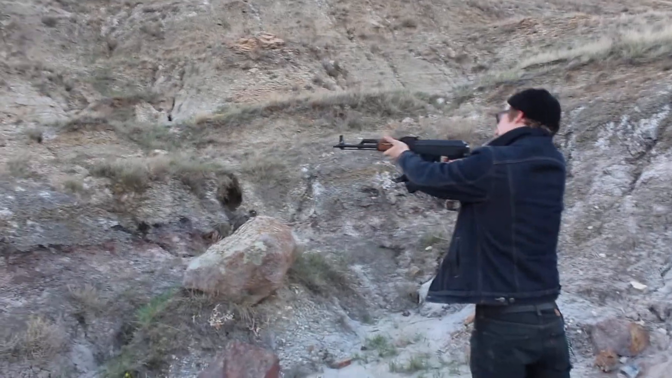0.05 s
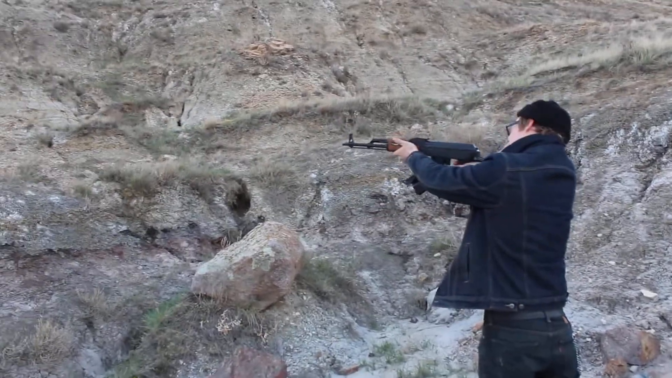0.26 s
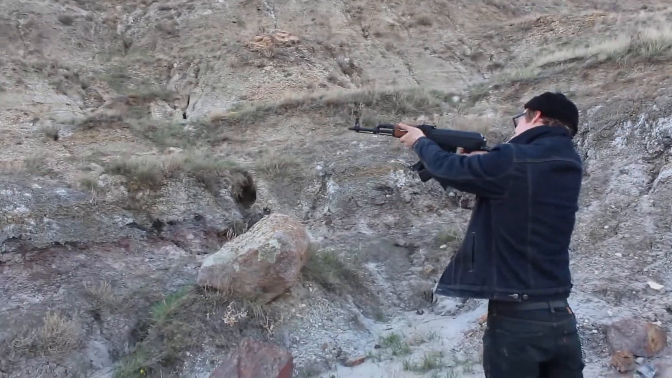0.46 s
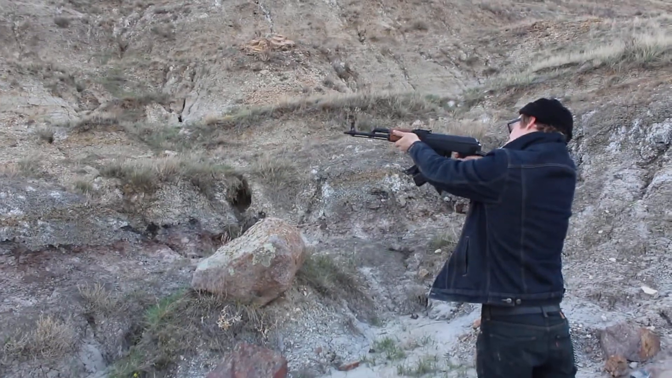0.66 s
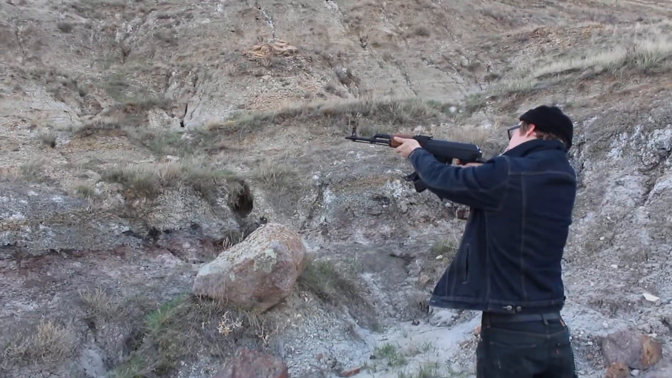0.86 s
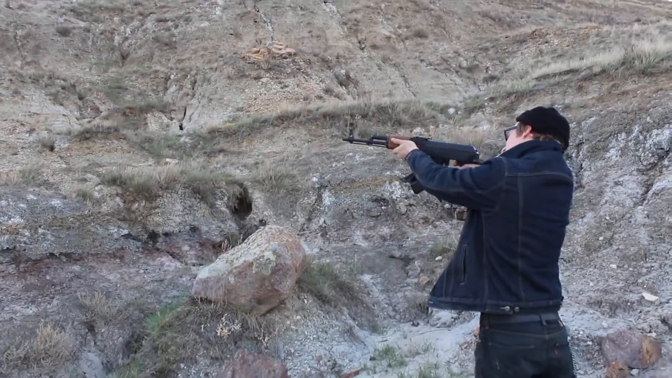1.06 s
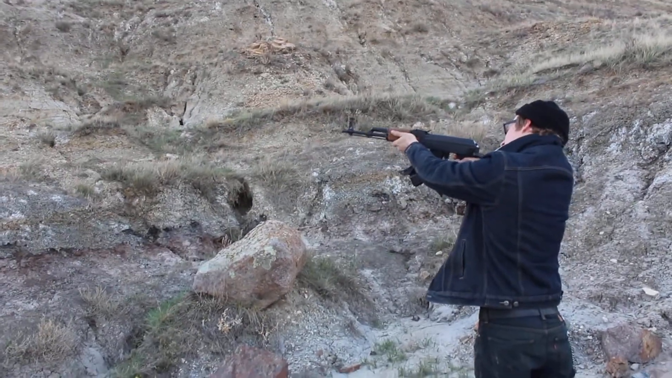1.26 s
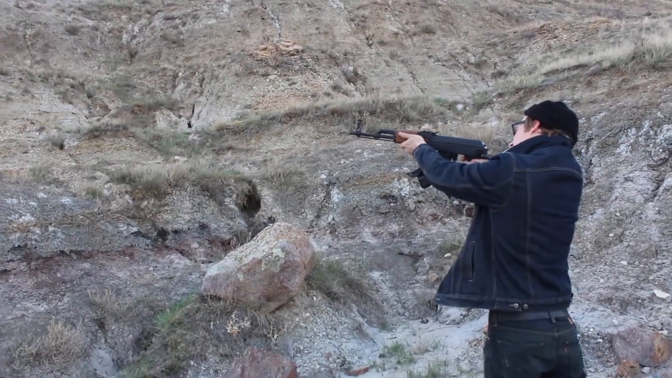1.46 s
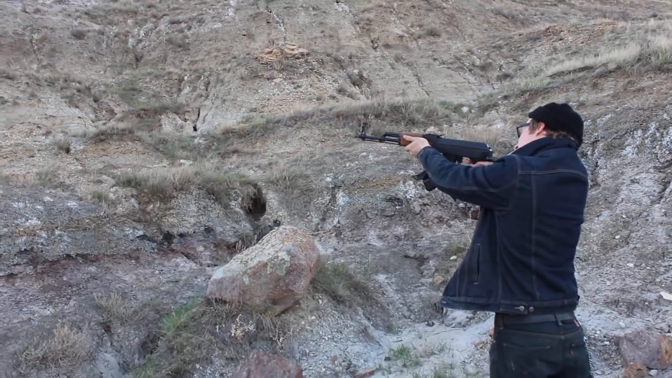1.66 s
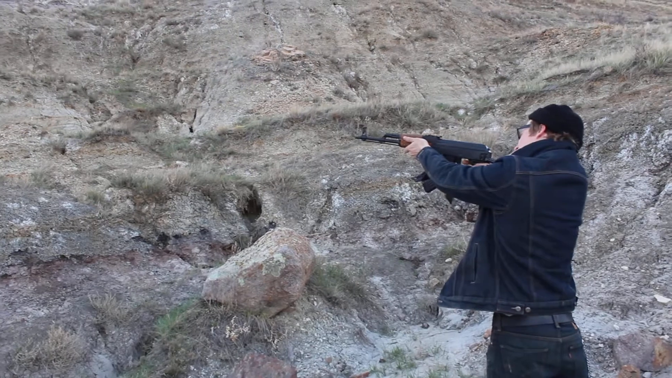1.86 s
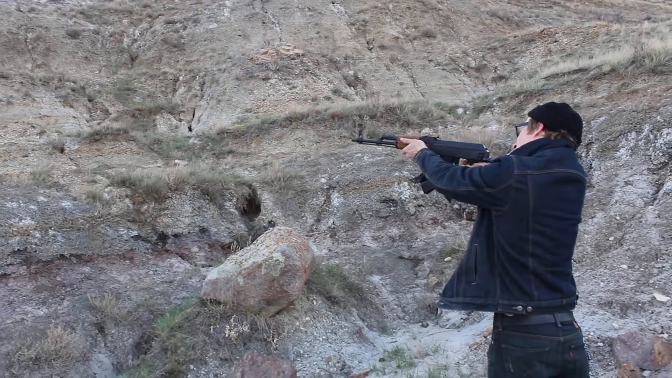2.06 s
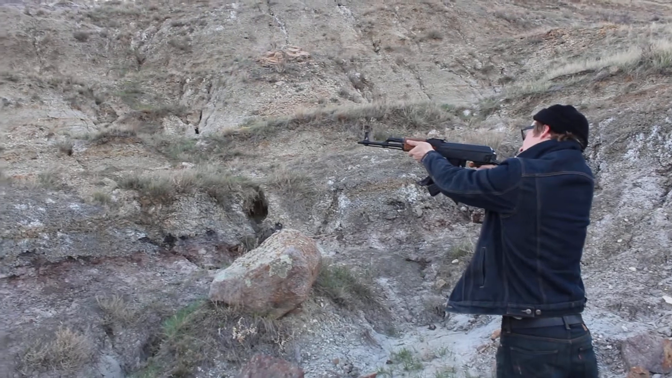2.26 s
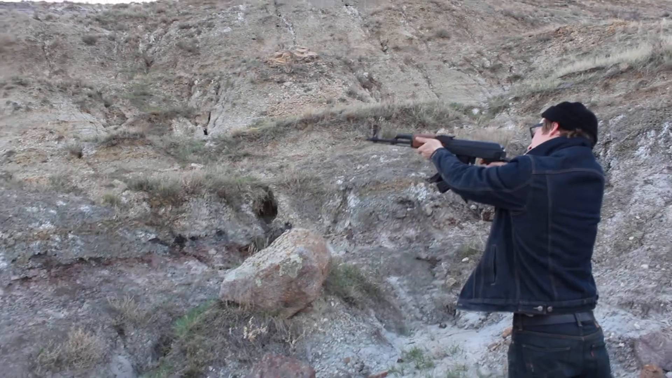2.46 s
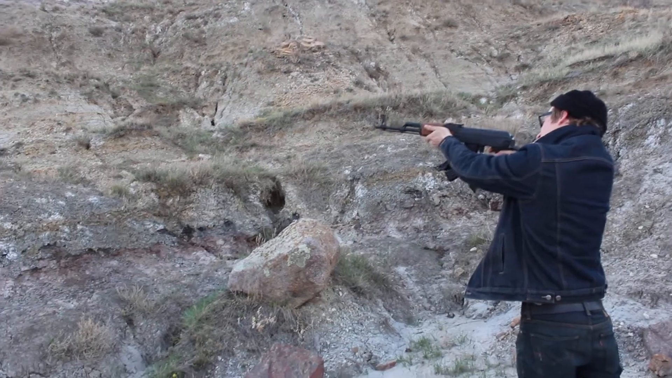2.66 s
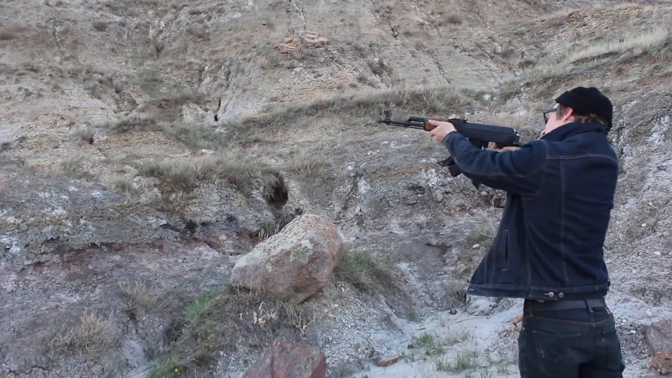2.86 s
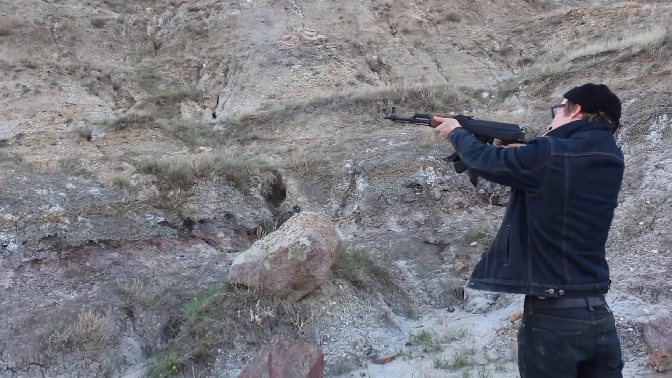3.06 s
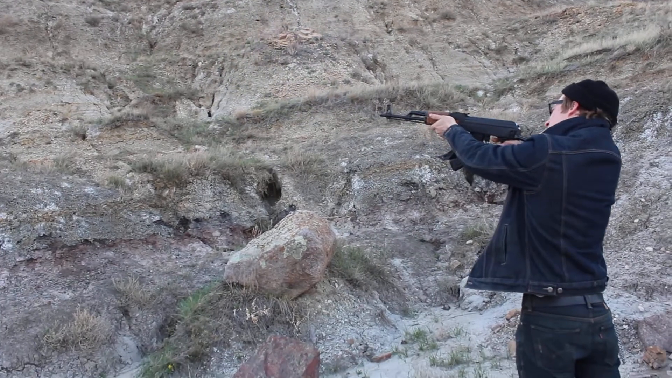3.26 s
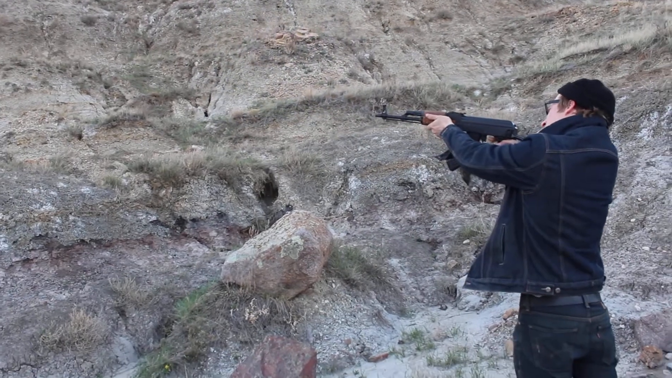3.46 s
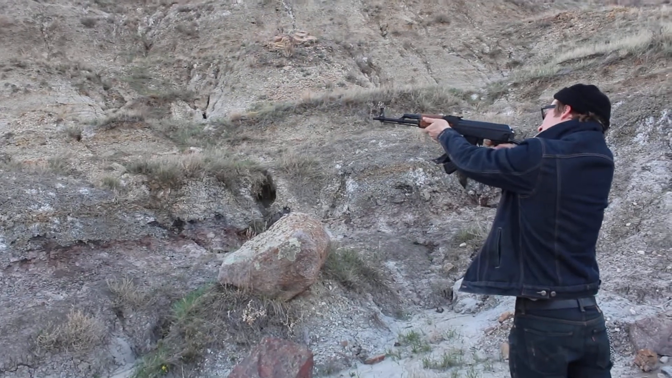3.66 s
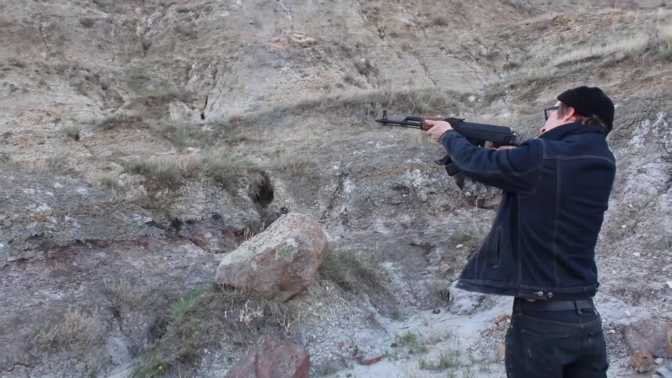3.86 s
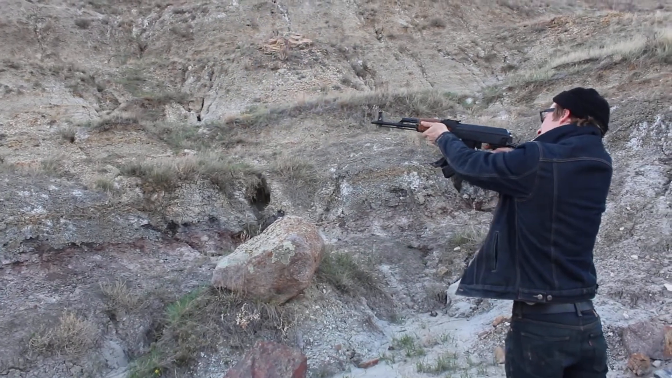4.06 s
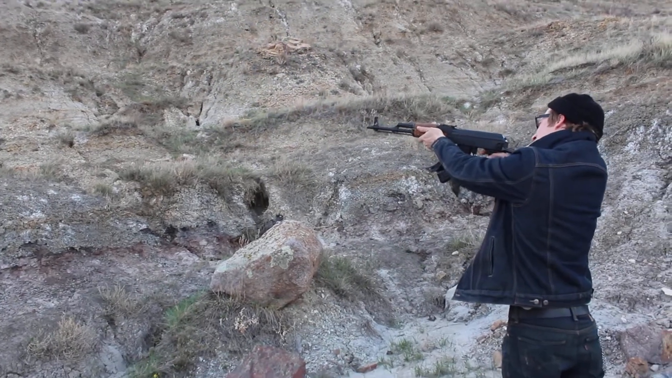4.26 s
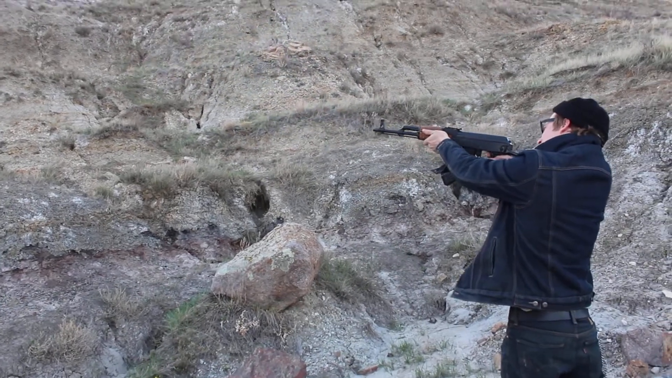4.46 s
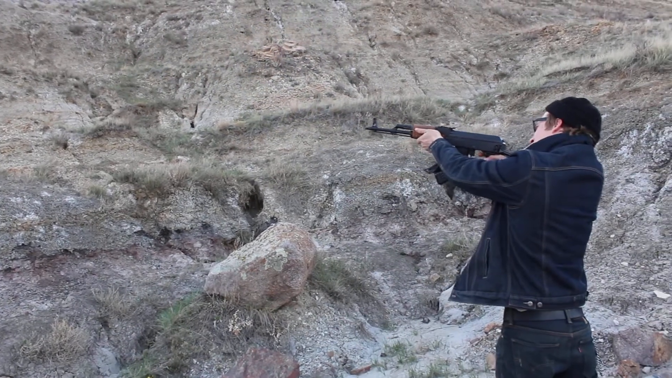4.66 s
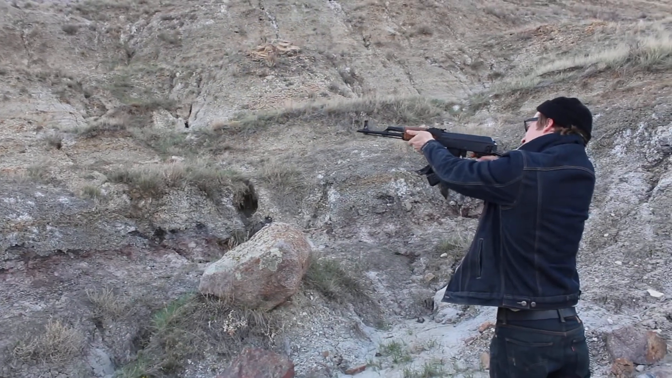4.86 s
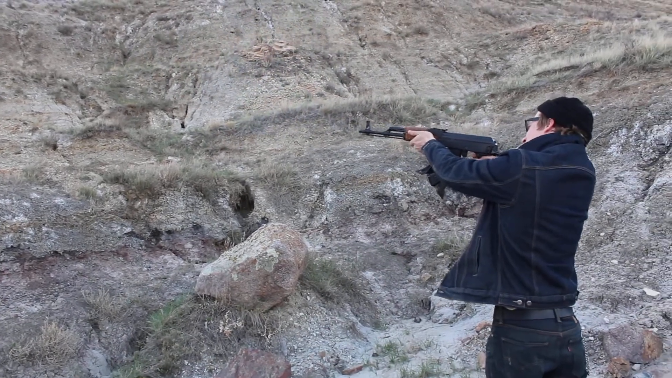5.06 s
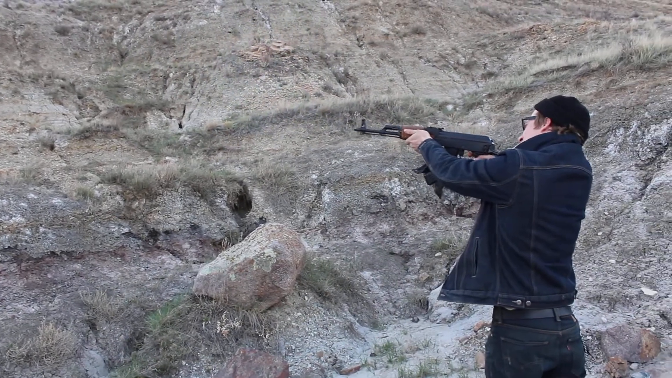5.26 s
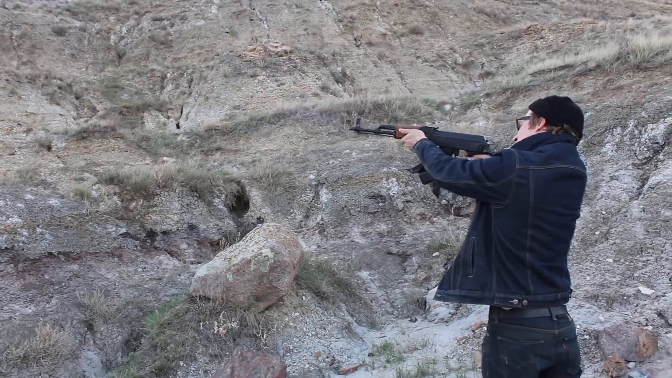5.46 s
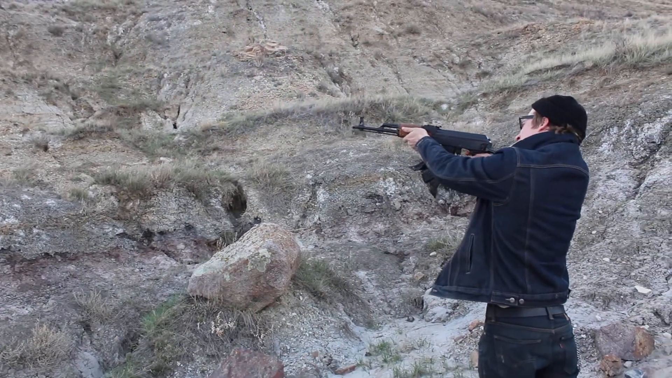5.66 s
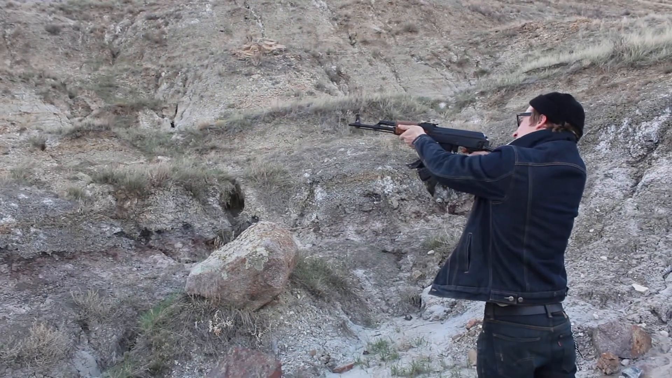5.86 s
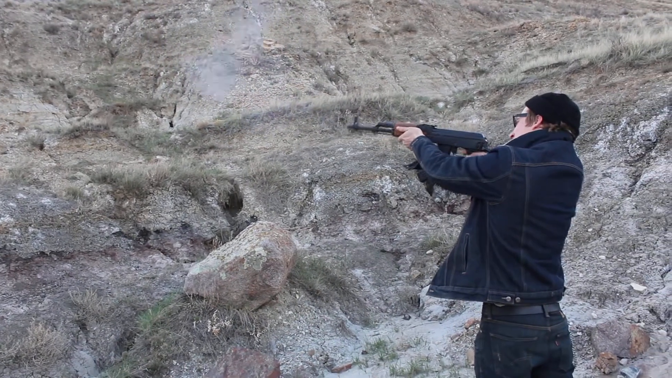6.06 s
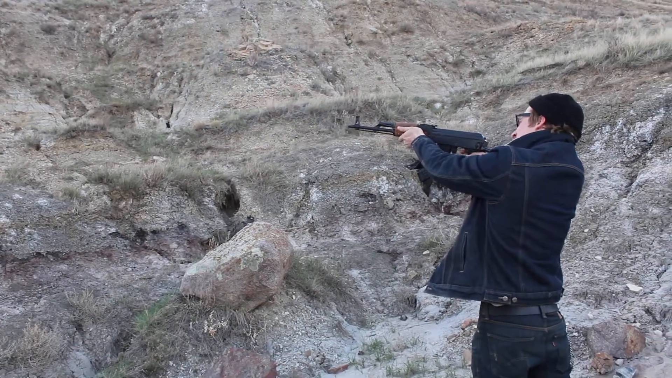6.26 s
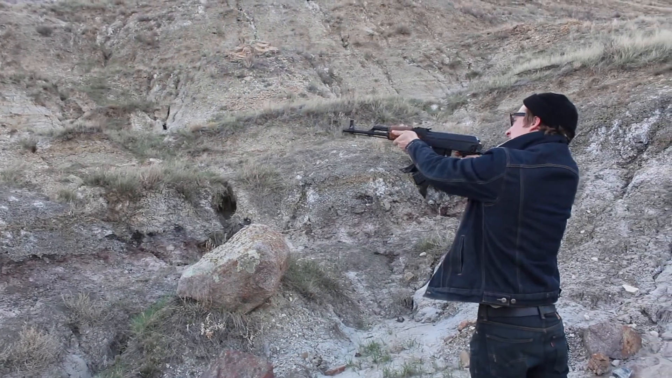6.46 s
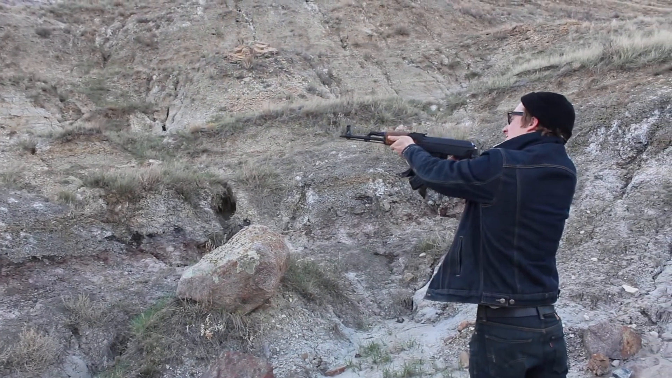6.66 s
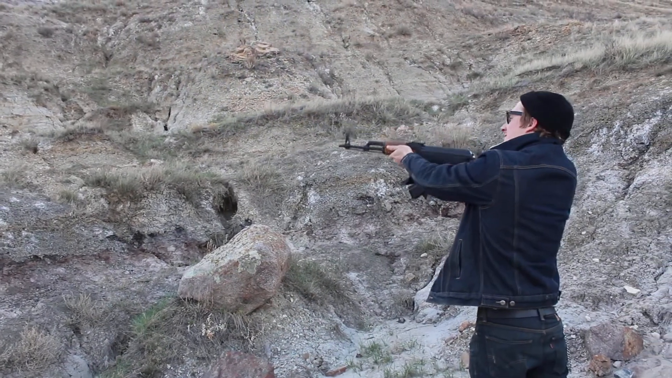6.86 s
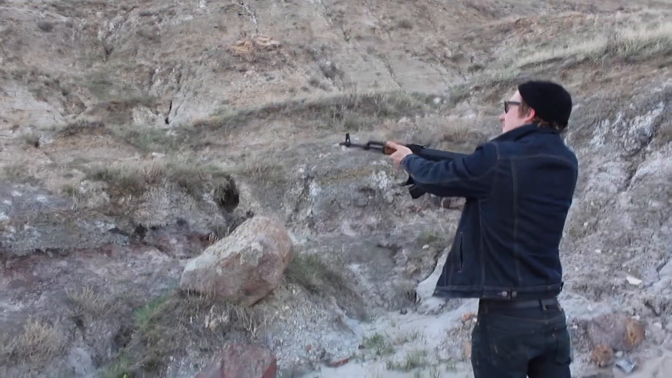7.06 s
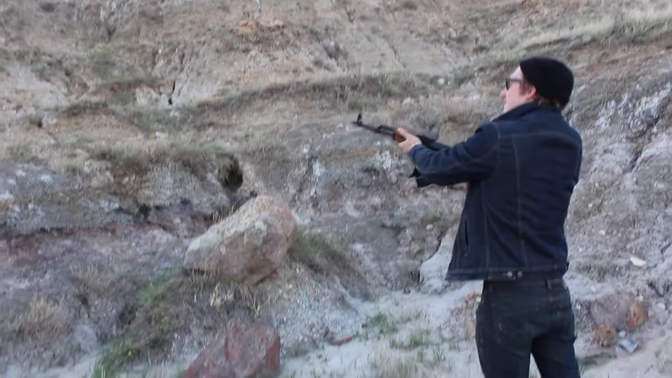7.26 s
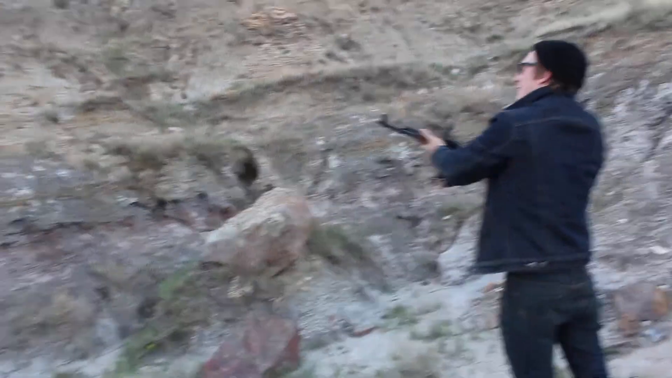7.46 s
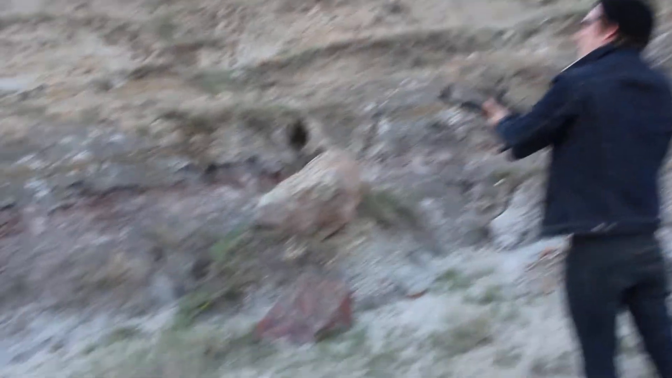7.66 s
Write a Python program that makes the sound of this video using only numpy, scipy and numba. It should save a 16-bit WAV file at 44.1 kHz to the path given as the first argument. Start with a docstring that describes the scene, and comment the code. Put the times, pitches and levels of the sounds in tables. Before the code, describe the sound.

Gusty wind rumbles and puffs against a nearby stereo microphone on a rocky slope. After almost two seconds, a rifle begins firing single shots, seven in all, the later ones more closely and evenly spaced. Each overloaded, abrupt crack scatters into short hillside echoes, followed by a bullet knock on stone. Grit patters after the early shots, a spent case rings faintly, and the ending returns to wind with tiny pebble clicks.

```python
"""Seven single rifle shots on a rocky slope, near a microphone with two ports in gusty wind.
Each blast is noise scattered by one hill, shaped by echo and air loss; it overloads the microphone,
and the recorder pulls its bass down and lets it back while the slopes echo. Bullets knock on rock in
a spray of noise, grit patters down as tiny clicks, and spent cases ring on the stones as decaying sines.
Wind is filtered noise at each port: a rumble, a roar that follows its swings, and short puffs."""
import sys
import numpy as np
from scipy import signal
from scipy.fft import rfft, irfft
from scipy.io import wavfile
from scipy.ndimage import uniform_filter1d
from numba import njit

SR = 44100
rng = np.random.default_rng(int(sys.argv[2]) if len(sys.argv) > 2 else 0)


def master_out(mix):
    """Clip the mix to full scale and print it as 16-bit PCM to the path in sys.argv[1]."""
    frames = np.transpose(np.atleast_2d(mix))
    ceiling = np.clip(frames, -1, 1)
    pcm = np.round(ceiling * 32767).astype(np.int16)
    wavfile.write(sys.argv[1], SR, pcm)


def makeup_ratio(level_db):
    """Linear amplitude ratio for a level in decibels (20 dB per factor of ten)."""
    decades = np.asarray(level_db, float) / 20
    return 10 ** decades


N = 340842  # length in samples


def evened(x):
    """Scales to rms 1."""
    return x / np.sqrt(np.mean(x ** 2, -1, keepdims=True) + 1e-20)


def read(points, hz):
    """Reads a spectrum table along a log frequency axis."""
    f, value = np.transpose(points)
    return np.interp(np.log(hz + 1), np.log(f + 1), value)


def colour(x, response):
    """Filters by a response given as a function of frequency."""
    return irfft(rfft(x) * response(np.fft.rfftfreq(x.shape[-1], 1 / SR)), x.shape[-1])


def add(mix, s, sound, pan_db=0.):
    """Mixes a sound in at a time in seconds, leaning left (positive) or right."""
    part = mix[:, round(s * SR):][:, :sound.shape[-1]]
    panned = sound * makeup_ratio([[pan_db / 2], [-pan_db / 2]])
    part += panned[:, :part.shape[1]]


def ports(first, other):
    """The left port hears first; the right hears a slightly later, slightly different copy."""
    gap_s, same = 4e-5, 0.71  # same: likeness of the two ports
    right = same * first + np.sqrt(1 - same ** 2) * other
    return np.array([first, colour(right, lambda hz: np.exp(-2j * np.pi * hz * gap_s))])


# What comes back from the slopes after each blast, the muzzle itself first.
# Each row: delay after the blast in seconds, relative level in dB, spread in seconds.
ECHOES = [(0.001, 19.5, 0.0022), (0.014, 3.5, 0.014), (0.025, 1.5, 0.0072), (.039, -6, 0.0046),
          (.064, -14, 0.011), (.087, -11.5, 0.0075), (0.109, -19, 0.0093), (.15, -17, 0.021),
          (.195, -22, 0.016), (0.282, -24, 0.027), (0.332, -33.5, 0.014), (.4, -29.5, 0.045),
          (.5, -41.5, 0.051)]


def echo_db(t):
    """Each echo swells quickly and dies more slowly, on top of the valley's scattered wash."""
    wash_db, wash_db_per_s = -23.5, -36.5
    power = makeup_ratio(2 * (wash_db + wash_db_per_s * t))
    for s, db, spread in ECHOES:
        u = (t - s) / spread
        power = power + makeup_ratio(2 * db) * np.exp(np.where(u < 0, -u ** 2, -u * 2))
    return 10 * np.log10(power)


# The shots. Each row: time in seconds, relative level in dB, late echo change in dB,
# brightness in dB at 8 kHz.
SHOTS = [(1.7097, -0.5, -0.5, 2.5), (2.9229, -0.5, 0.5, 3), (3.745, -0.5, -1, 3), (4.3831, -1, -3, 1.5),
         (4.9555, 0.5, -4, 1), (5.516, -1, -4, 2.5), (6.0796, -0.5, -6, 2.5)]
# Tone of the blast. Each row: frequency in Hz, relative level in dB.
BLAST_TONE = [(60, -0.5), (250, 3.5), (450, 12.5), (680, -9.5), (1000, -10.5), (2000, -10), (4000, -10.5),
              (8000, -14.5), (16000, -23.5)]
# Extra loss in the air on long paths. Each row: frequency in Hz, loss in dB per second.
AIR_LOSS = [(300, 5), (1000, -4.5), (2500, 6), (5000, 38.5), (9000, 54), (16000, 75.5)]
# Sharper first milliseconds. Each row: frequency in Hz, boost in dB.
CRACK_TONE = [(300, 1), (1000, 2), (3000, 5), (6000, 2.5), (16000, 2.5)]
# The near ground rings low for a moment. Each row: frequency in Hz, boost in dB.
GROUND_TONE = [(150, 0.5), (400, 3.5), (680, 5.5), (1100, 4.5), (2500, -5.5)]


def shot(hill, ledges_db, peak_db, late_db, bright_db):
    """The blast scattered by the same hill each time, with a share of new chance; air dulls the late part."""
    scattered = hill + .5 * rng.standard_normal(hill.shape)
    hz, t, z = signal.stft(scattered, SR, nperseg=128, noverlap=96)
    hz = hz[:, None]
    crack = np.exp(-(t / .006) ** 2)
    ground = np.exp(-((t - .024) / .018) ** 2)
    tone_db = read(BLAST_TONE, hz) - read(AIR_LOSS, hz) * t + bright_db * hz / 8000
    tone_db = tone_db + read(CRACK_TONE, hz) * crack + read(GROUND_TONE, hz) * ground
    # echoes swell unevenly from band to band
    patches = uniform_filter1d(rng.standard_normal(tone_db.shape), size=5, axis=0)
    patches = evened(uniform_filter1d(patches, size=40, axis=1))
    tone_db = tone_db + 2.5 * patches * np.clip(t / .1, 0, 1)
    sound = signal.istft(z * makeup_ratio(tone_db), SR, nperseg=128, noverlap=96)[1][:, :hill.shape[1]]

    t = np.arange(hill.shape[1]) / SR
    level_db = echo_db(t) + late_db * np.clip(t / 0.38, 0, 1) + ledges_db * np.clip(t / 0.09, 0, 1)
    rise = np.clip(t / 0.00089, 0, 1) ** 6
    fade = np.clip((t[-1] - t) / .15, 0, 1) ** 2  # the tail fades out over its last 0.15 s
    return ports(*sound * makeup_ratio(peak_db + level_db) * rise) * fade


# Bullets on rock. Each row: time in seconds, knock level in dB, spray level in dB, both relative.
STRIKES = [(1.7946, -13, -25.5), (3.0066, -10.5, -26.5), (3.8307, -13.5, -27.5), (4.4671, -1.5, -29.5),
           (5.038, -8, -31.5), (5.6017, -3, -33.5), (6.1654, -12.5, -34)]


def strike(knock_db, spray_db):
    """A short hollow knock from the rock inside a spray of splinters."""
    t = np.arange(-600, 900) / SR
    after = np.maximum(t - .001, 0)
    knock = -np.sin(2 * np.pi * 1900 * after) * np.exp(-after / .00035)
    chips = rng.standard_normal((2, len(t))) * (after > 0) * np.exp(-after / .0018) * .45
    spray = rng.standard_normal((2, len(t)))
    spray = colour(spray, lambda hz: (hz / 4000) ** 1.5 / (1 + (hz / 6500) ** 3.5))
    spray *= makeup_ratio(spray_db) * np.exp(-((t - .001) / 0.007) ** 2)
    return ports(*(makeup_ratio(knock_db) * (knock + chips) + spray))


# Spent cases on the stones. Each row: time in seconds, relative level in dB, knock in dB,
# upper ring in dB, main ring in Hz.
CASES = [(2.7881, -43, 3.5, 0, 8770), (5.3255, -63, -13.5, 6, 8560), (6.536, -53, -3, 6, 8570),
         (6.9476, -48, -8, 3, 8770)]
# Modes of the tube. Each row: multiple of the main ring, relative level in dB,
# time to fall 60 dB in seconds (before the tumbling).
CASE_MODES = [(.2515, -10, .06), (1, 0, .25), (1.672, -1, .24)]


def case(level_db, knock_db, upper_db, hz):
    """A thin metal tube hits stone and rings, wavering as it tumbles."""
    t = np.arange(6000) / SR
    waver = evened(uniform_filter1d(rng.standard_normal(len(t)), size=130))
    tumble = (1 - np.exp(-t / .008)) * makeup_ratio(5.0 * waver)
    # the ring slides up to pitch as the tube leaves the stone
    bent = t - .012 * .015 * (1 - np.exp(-t / .015))
    ring = np.zeros(len(t))
    for k, db, t60 in CASE_MODES:
        mode_db = db + upper_db * (k > 1) - 60 * t / t60
        ring += makeup_ratio(mode_db) * np.sin(2 * np.pi * k * hz * bent)
    skid = rng.standard_normal((2, len(t))) * (np.exp(-t / 0.0087) + 0.34 * np.exp(-t / 0.016))
    skid = colour(skid, lambda f: (f / 2000) ** 2 / (1 + (f / 3000) ** 3))
    return makeup_ratio(level_db) * ports(*(0.41 * ring * tumble + makeup_ratio(knock_db) * skid))


# The larger pebbles. Each row: time in seconds, relative level in dB, treble in dB at 12 kHz,
# left over right in dB.
PEBBLES = [(2.2915, -32.5, -19, 3), (2.3261, -32, -36.5, -4.5), (2.3507, -26.5, -32, 6.5),
           (2.4019, -38, -31.5, 15), (3.471, -32.5, -17.5, 1), (6.5226, -49.5, -17.5, 7),
           (6.7021, -43, -24, 12.5), (6.7899, -44.5, -23.5, 6.5), (6.83, -45, -12, 10.5),
           (6.8856, -40.5, -35, 4.5), (6.976, -39.5, -20.5, 8), (7.0844, -42.5, -14.5, 13),
           (7.1894, -37, -30, 2), (7.212, -35.5, -44, -5.5), (7.313, -39, -15.5, 7.5),
           (7.3816, -31.5, -13, 1), (7.4136, -38, -1.5, 0.5), (7.426, -33, -7.5, -13.5),
           (7.5346, -41, -32, 1.5), (7.5744, -38, -21, 7), (7.6132, -38, -8, 5)]


def tick(level_db, treble_db):
    """A hard, dry click of a millisecond or two, as of a pebble landing: decaying filtered noise."""
    t = np.arange(400) / SR
    noise = rng.standard_normal((2, len(t))) * np.exp(-t / 0.0011)
    tone = [(700, -20.0), (3000, -2.5), (6000, -6.5), (12000, treble_db)]  # (Hz, dB)
    return makeup_ratio(level_db) * ports(*colour(noise, lambda hz: makeup_ratio(read(tone, hz))))


# Showers of fine grit. Each row: time of the peak in seconds, level in dB,
# rise in seconds per 10 dB, fall in seconds per 10 dB.
SHOWERS = [(2.339, -56, .05, 0.13), (3.478, -56.5, .02, .03), (3.615, -58.5, .015, 0.027),
           (6.96, -71.5, .4, 0.6), (7.651, -66, .4, 0.37)]


def patter():
    """Many small grains of uneven size, dense enough to rustle, and small pebbles among them."""
    grains_per_s, pebbles_per_s, pebble_db = 1200, 55, 18  # pebble level before its random size
    t = np.arange(N) / SR
    level = np.zeros(N)
    for s, db, rise, fall in SHOWERS:
        level += makeup_ratio(db - 10 * np.maximum((s - t) / rise, (t - s) / fall))
    size = (rng.random(N) < grains_per_s / SR) * makeup_ratio(4.0 * np.minimum(rng.exponential(1, N), 5))
    density = 1.5 + signal.lfilter([1], [1, -np.exp(-1 / (.001 * SR))], size)  # each grain dies in 1 ms
    grains = density * rng.standard_normal((2, N))
    grains = evened(colour(grains, lambda hz: (hz / 2200) ** 2 / (1 + (hz / 3200) ** 2.7)))
    falls = (rng.random(N) < pebbles_per_s / SR) * rng.random(N)
    kind = rng.integers(0, 6, N)  # six different clicks
    pebbles = np.zeros((2, N))
    for k in range(6):
        hits = (falls * (kind == k))[None]
        pebbles += signal.oaconvolve(hits, tick(pebble_db, -10.0), axes=1)[:, :N]
    return (ports(*grains) + pebbles) * level


# Puffs on the ports. Each row: time in seconds, peak in dB before panning,
# half the fall time to 1/e in seconds, left over right in dB.
PUFFS = [(0.149, -15.5, 0.004, -3), (0.286, -23, 0.0067, -5.5), (0.322, -17, 0.0064, -7),
         (0.379, -24.5, 0.0089, -3), (0.416, -19.5, 0.0018, 14), (0.546, -20, 0.0084, -7),
         (0.571, -23.5, 0.0015, -5.5), (0.661, -20.5, .005, 2), (0.697, -23.5, 0.0012, 1.5),
         (0.829, -24, 0.0025, -3), (0.876, -18, .003, 2.5), (0.91, -29, 0.0045, 10.5),
         (1.207, -28.5, 0.021, 4.5), (2.185, -22, 0.0069, 2.6), (2.826, -34, 0.0016, -11.5),
         (3.387, -23.5, 0.0025, 3.5), (3.665, -26, 0.0037, -5.5), (3.701, -19.5, 0.0052, -0.5),
         (4.175, -20, 0.0021, 11), (5.446, -11.5, 0.0013, -0.5), (5.472, -23, 0.002, 5.5),
         (5.997, -22, .003, 5), (6.44, -22, .003, 15), (6.814, -31, .005, 2), (6.97, -23.5, .005, 10),
         (7.108, -22.5, 0.0041, 1.5)]
# Tone of a puff. Each row: frequency in Hz, relative level in dB.
PUFF_TONE = [(200, 2), (500, 7.5), (900, 2.5), (1400, -9.5), (2500, -34), (6000, -61.5)]


def puff(peak_db, length):
    """An eddy bursting on a port: a short dull burst, quick to start and slower to fade."""
    t = np.arange(-300, 1200) / SR
    burst = np.exp(-(t / np.where(t < 0, .0015, 2 * length)) ** 2)
    noise = rng.standard_normal((2, len(t))) * burst
    noise = colour(noise, lambda hz: makeup_ratio(read(PUFF_TONE, hz)))
    return makeup_ratio(peak_db) * noise / abs(noise).max()


# Tone of the wind. Each row: frequency in Hz, relative density in dB per Hz.
WIND_TONE = [(12, -42), (20, -6.5), (54, 3), (167, -4), (359, -18.5), (490, -26.5), (668, -30.5),
             (1000, -41.5), (1300, -51.5), (1800, -63), (3900, -78.5), (6000, -88), (7800, -123),
             (13200, -120)]
# The wind between buffets. Each row: time in seconds, rumble in dB before drift and flattening,
# roar over rumble in dB.
BREEZE = [(0, -12.5, -13), (0.599, -24.5, -14), (0.751, -26, -12.5), (.95, -16, -17.5), (1.18, -27, -18),
          (1.221, -16.5, -15), (1.5, -22.5, -23), (2.1, -17.5, -18.5), (2.65, -23.5, -17.5),
          (2.902, -22, -11.5), (3.15, -19.5, -11), (3.399, -16.5, -19.5), (4.201, -18, -12),
          (4.8, -19, -13.5), (4.912, -38, -20.5), (5.149, -19.5, -17.5), (5.402, -29.5, -12),
          (5.7, -16, -13), (5.9, -26, -15.5), (6.3, -13.5, -12), (6.618, -24.5, -11), (6.78, -29, -17),
          (6.9, -20, -13), (7.251, -24.5, -23), (7.73, -17.5, -12)]
# Buffets, each swell begun earlier and stretched below. Each row: nominal start in seconds,
# nominal length in seconds, relative rumble level in dB, left over right in dB.
BUFFETS = [(0.009, 0.023, -14, 7), (0.132, 0.096, -14, 5.5), (0.284, 0.11, -16.5, 5.5),
           (0.393, 0.059, -14, 9), (0.518, 0.1, -10.5, 5), (0.635, 0.098, -15, 2.5),
           (0.833, 0.055, -15, -5), (0.899, .042, -15.5, 3.5), (0.998, 0.049, -20.5, 1),
           (1.25, 0.12, -16.5, -0.5), (1.375, 0.041, -22.5, -8.5), (1.572, 0.23, -23.5, -4),
           (1.843, 0.082, -16.5, -6), (1.978, 0.16, -16, -2), (2.124, 0.023, -7.5, -6),
           (2.199, 0.062, -8, -6), (2.446, .11, -14, -4.5), (2.689, 0.13, -17.5, -3.5),
           (2.819, 0.079, -11.5, 1.5), (2.906, 0.086, -12.5, 1), (3.14, 0.022, -23, 0),
           (3.364, 0.14, -17, -6), (3.565, 0.24, -16, -1), (4.017, 0.18, -16, -3.5),
           (4.178, 0.019, -12.5, 8), (4.247, 0.055, -13.5, -4), (4.329, 0.048, -12.5, 0),
           (4.51, 0.065, -15.5, -6), (4.642, 0.051, -18.5, 7), (4.681, 0.19, -17, -4),
           (5.157, 0.16, -20, 4.5), (5.336, .047, -20, -9), (5.438, 0.09, -17, -4.5),
           (5.689, 0.077, -16.5, -5), (5.804, 0.073, -23, 8), (5.975, 0.13, -14, 1),
           (6.29, 0.45, -15.5, 3.5), (6.586, 0.055, -23, 12.5), (6.822, 0.021, -7, -10.5),
           (6.97, 0.047, -16, 11), (7.103, 0.053, -13.5, -1.5), (7.312, 0.064, -20, -1),
           (7.444, 0.049, -18.5, 0.5), (7.542, 0.032, -13, 6), (7.628, 0.03, -16.5, -4),
           (7.708, 0.044, -24, 0)]


def wind():
    """Turbulence, separate at each port: a rumble, and a roar that flares where the rumble swings hard."""
    wander_db = 6.5  # drift of the wind between the ports
    roar_share = 0.7  # exponent by which the roar follows a buffet's rise

    def tone(hz):
        return makeup_ratio(read(WIND_TONE, hz))

    def rumble_part(hz):
        return 1 / (1 + (hz / 300) ** 4)

    s, rumble_db, roar_db = np.transpose(BREEZE)
    t = np.arange(N) / SR
    low, high, lump = rng.standard_normal((3, 2, N))
    lump = np.tanh(1.4 * evened(colour(lump, lambda hz: (hz > 2) / (1 + (hz / 25) ** 2))))
    low = low * makeup_ratio(3.5 * lump)
    low = evened(colour(low, lambda hz: tone(hz) * rumble_part(hz)))
    swing = evened(uniform_filter1d(np.gradient(low, axis=1) ** 2, size=300))
    high = colour(high * (0.12 + swing ** 0.85), lambda hz: tone(hz) * (1 - rumble_part(hz)))
    wander = evened(colour(rng.standard_normal(N), lambda hz: (hz > 1) / (1 + (hz / 6) ** 2)))
    breeze = makeup_ratio(np.interp(t, s, rumble_db) + wander_db * wander * np.array([[.5], [-.5]]))

    power = breeze ** 2
    for start, length, db, pan_db in BUFFETS:
        u = np.arange(0, 1.37 * length, 1 / SR)
        swell = 2.0 * makeup_ratio(2 * db) * np.sin(np.pi * u / u[-1]) ** 2
        add(power, max(start - 0.41 * length, 0), swell, 2 * pan_db)  # doubled because it is power
    rise = np.sqrt(power) / breeze
    roar = rise ** roar_share * evened(high) * makeup_ratio(np.interp(t, s, roar_db))
    flow = breeze * (rise * low + roar)
    return .8 * np.tanh(flow / .8)  # the strongest swings flatten in the narrow port


def scene():
    """Everything that happens on the hill, over the wind at the ports."""
    mix = wind() + patter()
    hill = rng.standard_normal((2, 40000))
    # single rocks answer apart
    ledges_db = 1.4 * evened(uniform_filter1d(rng.standard_normal(40000), size=350))
    for s, *row in SHOTS:
        add(mix, s - .023, tick(-45.5, -25.0))  # the trigger lets the hammer go
        add(mix, s - .0007, shot(hill, ledges_db, *row))
    for s, *row in STRIKES:
        add(mix, s - 600 / SR, strike(*row))
    for s, *row in CASES:
        add(mix, s, case(*row))
    for s, db, treble_db, pan_db in PEBBLES:
        add(mix, s, tick(db, treble_db), pan_db)
    for s, db, length, pan_db in PUFFS:
        add(mix, s - 300 / SR, puff(db, length), pan_db)
    return mix * signal.windows.tukey(N, 600 / N)  # soft start and end


@njit
def dive(overload, depth_db, hold, down, up):
    """Gain in dB: an overload starts a timer; the gain slides down while it runs, back up when it ends."""
    out, now, left = np.zeros(len(overload)), 0., 0.
    for i in range(len(out)):
        if overload[i] and left <= 0:
            left = hold
        left -= 1
        if left > 0:
            now += (depth_db - now) * down
        else:
            now -= now * up
        out[i] = now
    return out


def band_limit(x):
    """A steep low-pass at the top of the band."""
    return signal.sosfilt(signal.butter(12, 16040, fs=SR, output="sos"), x)


def record(dry):
    """On overload the recorder pulls its bass down, holds and lets go; the converter clips."""
    depth_db, hold_s, down_s, return_s, bass_hz = -17, 0.14, .003, 0.025, 650
    overload = abs(dry).max(0) > 1.5
    gain_db = dive(overload, depth_db, hold_s * SR, 1 / (down_s * SR), 1 / (return_s * SR))
    bass = colour(dry, lambda hz: 1 / (1 + (hz / bass_hz) ** 4))
    hiss = makeup_ratio(-79) * rng.standard_normal(dry.shape)
    clipped = np.clip(dry + bass * (makeup_ratio(gain_db) - 1) + hiss, -1, 1)
    finished = signal.lfilter(*signal.butter(2, 15000, fs=SR), clipped)  # softer above 15 kHz
    return band_limit(finished)


dry = scene()
out = record(dry)
master_out(out)
```